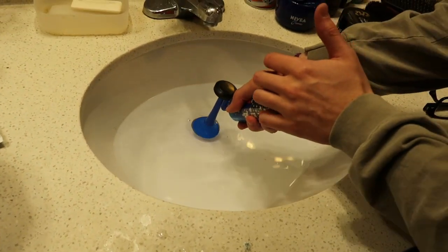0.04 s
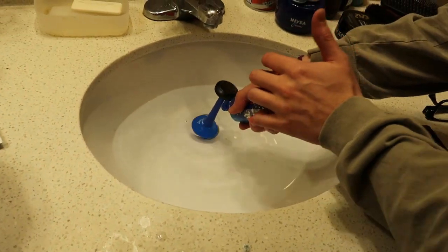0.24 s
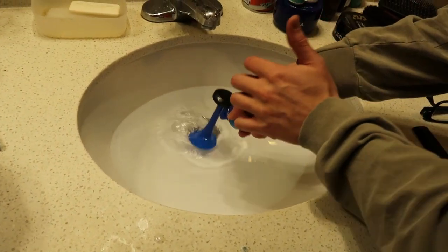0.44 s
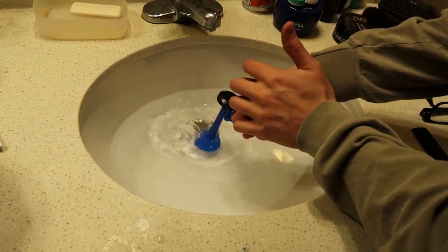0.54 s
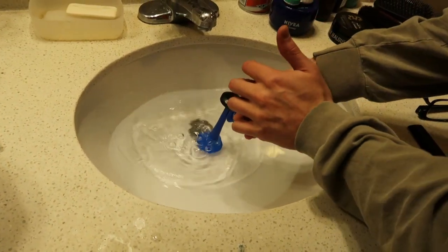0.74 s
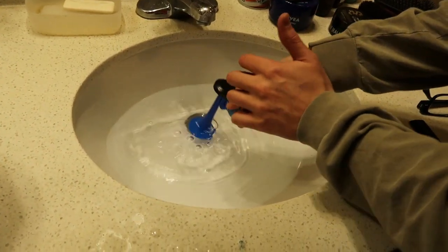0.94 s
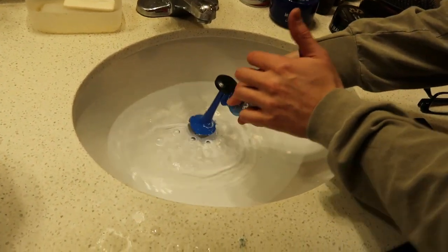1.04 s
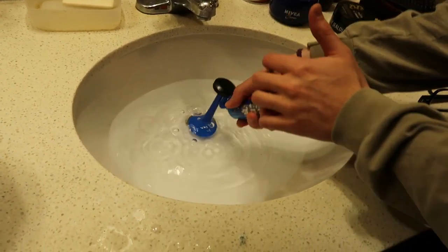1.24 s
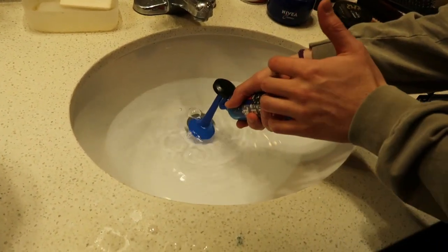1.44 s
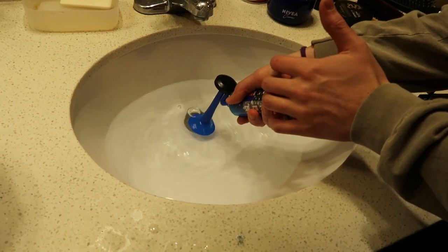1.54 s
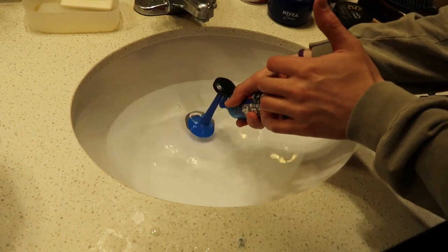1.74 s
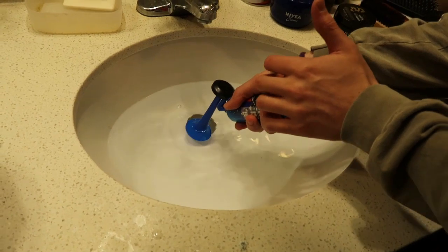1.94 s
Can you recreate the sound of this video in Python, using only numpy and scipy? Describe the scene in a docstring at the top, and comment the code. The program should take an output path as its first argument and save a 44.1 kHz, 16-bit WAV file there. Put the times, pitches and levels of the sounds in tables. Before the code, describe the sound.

A small bulb horn squeezed underwater in a sink gives quick squeaky honks, then bubbles and wheezes

```python
"""Underwater bulb horn

A small bulb horn, its bell under water in a sink, honks low, high, high, low: harmonic series of sagging pitch.
Bubbles gulp as gliding sinusoids and splashes burst as decaying noise. Air then hisses back in as band-shaped
noise with a pipe tone; plastic taps are resonant noise bursts over a thud, and drips are late bubbles.
A small tiled room adds a decaying noise tail; steady noise and two sinusoids give its rumble, hiss and hum."""
import sys
import numpy as np
from scipy import signal
from scipy.fft import rfft, irfft, next_fast_len
from scipy.io import wavfile
from scipy.ndimage import uniform_filter1d, map_coordinates

SR = 44100
rng = np.random.default_rng(int(sys.argv[2]) if len(sys.argv) > 2 else 0)


def amplitude_ratio(level_db):
    """Convert a level in decibels to the matching linear amplitude (field) ratio."""
    exponent = np.asarray(level_db, float) / 20
    return 10 ** exponent


def generate_wav(sig):
    """Save sig (samples, or channels by samples) to the path in sys.argv[1] as 16-bit PCM at SR."""
    pcm = np.round(np.clip(np.atleast_2d(sig).T, -1, 1) * 32767).astype(np.int16)
    wavfile.write(sys.argv[1], SR, pcm)


N = 88200
T = np.arange(N) / SR


def unit(x):
    """Normalization: scale to rms 1."""
    return x / np.sqrt(np.mean(x ** 2) + 1e-20)


def along(points, hz):
    """Interpolation of (f/Hz, value) points on a logarithmic frequency axis."""
    f, v = np.transpose(points)
    return np.interp(np.log(hz + 1), np.log(f + 1), v)


def wobble(rate):
    """Random modulation: a smooth curve through rate random knots a second."""
    return map_coordinates(rng.standard_normal(1500), [np.minimum(T * rate, 1498)])


def filtered(x, response):
    """Linear filtering: multiply the spectrum of x by a response of frequency."""
    m = next_fast_len(x.shape[-1] + 8192)
    spectrum = rfft(x, m) * response(np.fft.rfftfreq(m, 1 / SR))
    return irfft(spectrum, m)[..., :x.shape[-1]]


def rush(spectrum, alike):
    """Partial coherence: stereo noise of rms 1, its left-right likeness set by the mid/side balance."""
    def balance(hz):
        angle = np.arccos(np.clip(along(alike, hz), -1, 1)) / 2
        return amplitude_ratio(along(spectrum, hz)) * [np.cos(angle), np.sin(angle)]

    mid, side = filtered(rng.standard_normal((2, N)), balance)
    return unit(np.array([mid + side, mid - side]))


def add(out, s, sound):
    """Superposition: mix a sound in at time s."""
    part = out[round(s * SR):][:len(sound)]
    part += sound[:len(part)]


# spectrum of the steady noise: f/Hz, relative level/dB
NOISE_SPECTRUM = [(12, -42.5), (20, -10.5), (122, -9), (1070, -22.5), (2610, -25.5), (4070, -29.5),
                  (12800, -41.5), (15500, -86)]
# coherence of the steady noise: f/Hz, left-right likeness
NOISE_LIKENESS = [(60, 1), (1500, 0.19), (8000, .1)]
# hum, before its waver: f/Hz, level/dB
HUM_TONES = [(55, -60), (120, -66.5)]


def background():
    """Stationary noise for the rumble and hiss, with sinusoids of wavering amplitude for the hum."""
    hum = np.zeros(N)
    for hz, db in HUM_TONES:
        hum += amplitude_ratio(db + 7.9 * wobble(21)) * np.sqrt(2) * np.sin(2 * np.pi * hz * T)
    noise_db = -56.5 + 0.4 * wobble(0.94)
    return amplitude_ratio(noise_db) * rush(NOISE_SPECTRUM, NOISE_LIKENESS) + hum


# reverberation time: f/Hz, t60/s
REVERBERATION = [(200, 0.48), (2000, 0.3), (10000, 0.29)]


def room(x):
    """Frequency-dependent reverberation: convolution with noise that dies at its own speed in each band."""
    hz, t, z = signal.stft(rng.standard_normal((2, SR // 2)), SR, nperseg=256)
    decay = amplitude_ratio(-60 * t / along(REVERBERATION, hz)[:, None])
    tail = signal.istft(z * decay, SR, nperseg=256)[1]
    # the side part grows with frequency, so the bass stays alike in both ears
    mid, side = filtered(tail, lambda f: np.array([1 + 0 * f, np.clip(f / 6000, 0, 1)]))
    tail = np.array([mid + side, mid - side])
    delayed = np.pad(x, (200, 0))[None]  # predelay in samples
    return signal.fftconvolve(delayed, tail / np.linalg.norm(tail[0]), axes=1)[:, :N]


# returning air: t/s, hiss level/dB, thin hiss level/dB, pipe tone level/dB
AIR_LEVELS = [(0.941, -72.5, -93, -92), (1.04, -51.5, -70, -66), (1.13, -55.5, -69.5, -55.5),
              (1.198, -48.5, -53.5, -45), (1.299, -58, -60, -51), (1.43, -57, -65, -55),
              (1.621, -84, -74, -71.5)]
# spectrum of the hiss: f/Hz, relative level/dB
HISS_SPECTRUM = [(550, -5.5), (1300, -13), (1600, 1.5), (2000, -1.5), (2600, 0), (3300, -11), (3800, -51.5)]
# spectrum of the thin hiss: f/Hz, relative level/dB
THIN_SPECTRUM = [(3000, -29), (4050, 2.5), (4500, -9.5), (5150, 2.5), (5800, -9.5), (15000, -21.5)]


def refill():
    """Turbulence and pipe resonance: air sucked back gives two hisses and a breathy, narrow-band tone."""
    s, *cols = np.transpose(AIR_LEVELS)
    hiss_db, thin_db, pipe_db = [np.interp(T, s, c, left=-120, right=-120) for c in cols]
    pipe_hz, pipe_width_hz = 440, 36
    pipe = unit(filtered(rng.standard_normal(N), lambda f: 1 / (1 + ((f - pipe_hz) / pipe_width_hz) ** 2)))
    alike = [(500, 0.92)]  # the same likeness at all frequencies
    flutter_db = 1.5 * wobble(40)
    hiss = amplitude_ratio(hiss_db + flutter_db) * rush(HISS_SPECTRUM, alike)
    thin_hiss = amplitude_ratio(thin_db + flutter_db) * rush(THIN_SPECTRUM, alike)
    return hiss + thin_hiss + amplitude_ratio(pipe_db) * pipe


# taps of plastic: t/s, clack level/dB, rattle length/s, main resonance f/Hz, thud level/dB
PLASTIC_TAPS = [(1.135, -33, 0.005, 1650, -30.5), (1.1415, -26, .001, 682, -22),
                (1.477, -29, 0.024, 2500, -43), (1.539, -34, 0.003, 1540, -27.5),
                (1.796, -26.5, .014, 2415, -53)]
# colour of the plastic: multiple of the main resonance, relative level/dB
PLASTIC_COLOUR = [(.12, -13), (.3, -15), (.58, -6), (.75, -17), (1, 0), (1.25, -18), (1.6, -28), (2.4, -42),
                  (6, -65)]


def taps():
    """Impact excitation: rattling noise bursts in the colour of the plastic, over a decaying low thud."""
    out, t = np.zeros(N), T[:SR // 4]
    rattle_gap_s, plastic_t60_s = .0046, 0.027
    thud_hz, thud_t60_s = 95, 0.036
    onset = 1 - np.exp(-(t / .0004) ** 2)
    for s, db, rattle_s, main_hz, thud_db in PLASTIC_TAPS:
        colour = [(m * main_hz, d) for m, d in PLASTIC_COLOUR]
        for k in range(1 + int(rattle_s / rattle_gap_s)):
            noise = rng.standard_normal(len(t))
            clack = unit(filtered(noise, lambda f: amplitude_ratio(along(colour, f)))) * onset
            add(out, s + rattle_gap_s * k, amplitude_ratio(db - 0.5 * k - 60 * t / plastic_t60_s) * clack)
        add(out, s, amplitude_ratio(thud_db - 60 * t / thud_t60_s) * np.sin(2 * np.pi * thud_hz * t))
    return out


# bubbles: t/s, start f/Hz, end f/Hz, glide time/s, level before the envelope/dB
GLIDING_BUBBLES = [(0.208, 326, 337, 0.0081, -35), (0.339, 203, 255, 0.029, -26),
                   (.38, 431.5, 1058, 0.065, -35), (.488, 334.5, 360.5, 0.04, -27),
                   (0.486, 444.4, 618, 0.0088, -21.5), (.515, 603, 1032, 0.077, -50),
                   (.56, 200, 246, 0.012, -40), (.67, 546, 1044, 0.051, -42),
                   (0.821, 205, 269, 0.047, -47.5), (.84, 573, 1103, .035, -42),
                   (1.544, 414, 441, .03, -44.5), (1.535, 353, 342, 0.016, -29),
                   (1.677, 1500, 1637, 0.017, -41), (1.685, 1784, 2450, 0.018, -54),
                   (1.872, 99.5, 125, 0.078, -43), (1.889, 219, 286, 0.013, -35)]


def bubbles():
    """Bubble resonance: each bubble is a roughened sinusoid, most gliding upward as they surface."""
    out, t = np.zeros(N), T[:SR // 4]
    for s, start_hz, end_hz, glide_s, db in GLIDING_BUBBLES:
        u = t / glide_s
        hz = start_hz * (end_hz / start_hz) ** np.minimum(u, 1)
        rough_db = 5 * wobble(110)[:len(t)]
        envelope = amplitude_ratio(db - 8.6 * u ** 2 + rough_db) * (1 - np.exp(-u / 0.069))
        add(out, s, envelope * np.sin(2 * np.pi * np.cumsum(hz) / SR))
    return out


# splashes and brief hits as noise bursts: t/s, level before the envelope/dB, t60/s, treble tilt/(dB per octave)
NOISE_BURSTS = [(0.213, -24.5, 0.054, -3.5), (.328, -35.5, 0.056, 5.5), (0.488, -0.5, 0.016, -4.5),
                (0.53, -33, .3, -5), (.815, -33, 0.11, -10), (1.407, -28.5, 0.032, -3),
                (1.891, -48.5, 0.43, -9)]


def splashes():
    """Broadband transients: tilted noise with a soft onset and exponential decay."""
    out, t = np.zeros(N), T[:SR // 4]
    for s, db, t60, tilt_db in NOISE_BURSTS:
        noise = rng.standard_normal(len(t))
        # the tilt flattens out below about 1 kHz
        noise = unit(filtered(noise, lambda f: amplitude_ratio(tilt_db * np.log2(f / 1000 + 0.85)) * (f > 150)))
        add(out, s, amplitude_ratio(db - 60 * t / t60) * (1 - np.exp(-t / 0.0097)) * noise)
    return out


# spectrum of the rasping air: f/Hz, relative level/dB
RASP_SPECTRUM = [(150, -26.5), (400, -2.5), (1200, 0), (2500, -6), (5000, -6), (13000, -9), (16000, -28.5)]


def honk(rows, levels, tones_db, jitter):
    """Harmonic series of a reed: the fundamental, wavering overtones and rasping air."""
    s, *cols = np.transpose(rows)
    hz, bright_db, pan_db = [np.interp(T, s, c) for c in cols]
    db = np.interp(T, *np.transpose(levels))
    gate = np.clip(np.minimum(T - levels[0][0], s[-1] - T) / 0.0007, 0, 1)
    # the faster the pitch falls, the rougher the reed
    fall_rate = -np.gradient(np.log(hz)) * SR
    roughness = np.clip((fall_rate - 2) * .009, 0, .12)
    unsteady = 1 + jitter * wobble(90) - roughness * np.abs(wobble(400))
    phase = 2 * np.pi * np.cumsum(hz * unsteady) / SR

    upper = np.zeros((2, N))
    for k, tone_db in enumerate(tones_db):
        lean_db = 2.0 * wobble(45)  # left-right level wander
        skew = 0.3 * (k + 1) * wobble(23)  # left-right phase scatter in rad
        grain = 1 + 120 * jitter * wobble(600)  # fast flutter
        swell_db = 3 * wobble(40)  # each overtone swells on its own
        level = amplitude_ratio(tone_db + swell_db + [lean_db, -lean_db])
        start = rng.uniform(0, 2 * np.pi)
        upper += grain * level * np.sin((k + 2) * phase + start + [skew, -skew])
    # brightness raises the rasp half as many dB as the overtones
    rasp_db = -40 - bright_db / 2 + 8.3 * wobble(45)
    upper += amplitude_ratio(rasp_db) * rush(RASP_SPECTRUM, [(500, 0.26), (9000, 0.083)])

    effort = np.sqrt(np.abs(uniform_filter1d(amplitude_ratio(db) ** 2, size=900)))  # smoothed level
    fundamental = amplitude_ratio(db + [pan_db / 2, -pan_db / 2]) * np.sin(phase)
    return gate * np.sqrt(2) * (fundamental + effort * amplitude_ratio(bright_db) * upper)


# low honks, one list each: t/s, f/Hz, overtone gain/dB, left minus right level/dB
LOW_PITCHES = [
    [(.2, 1322, -20, 6), (.22, 1320, -7, -10.5), (.27, 1282, 8, -5.5), (.316, 1224, 2.5, 4),
     (.33, 1189, 8.5, -5), (.35, 1016, 7.5, 4)],
    [(.66, 1336, -7.5, -10), (.72, 1329, 1, 9), (.815, 1290, 0.5, 8), (.835, 1272, -27.5, -1),
     (.9, 1256, -28, 4)],
]
# high honks, one list each: t/s, f/Hz, overtone gain/dB
HIGH_PITCHES = [
    [(.342, 3069, 9), (.375, 2983, 11), (.39, 2939, -6.5), (.43, 2827, 12), (.44, 2857, -8),
     (.462, 2781, -4), (.467, 2414, -24.5), (.49, 1997, -25)],
    [(.482, 3078, 11), (.51, 3012, -5), (.628, 2875, 4), (.636, 2565, -26), (.662, 1630, -32)],
]
# fundamental of each low honk: t/s, level/dB
LOW_FUNDAMENTALS = [
    [(.19, -46.5), (.204, -27), (.216, -10.5), (.266, -22.5), (.284, -18.5), (.312, -16), (.328, -11.5),
     (.342, -21), (.35, -29.5)],
    [(.66, -53), (.698, -28.5), (.724, -37.5), (.74, -23), (.75, -38), (.79, -29), (.81, -40.5),
     (.828, -31.5), (.862, -53), (.885, -42), (.9, -82)],
]
# fundamental of each high honk: t/s, level/dB
HIGH_FUNDAMENTALS = [
    [(.342, -33.5), (.355, -18.5), (.369, -12.5), (.378, -21.5), (.388, -10), (.408, -12.5), (.42, -22),
     (.428, -14), (.438, -13), (.445, -25), (.454, -8.5), (.463, -15), (.468, -22), (.49, -32)],
    [(.482, -35), (.492, -10.5), (.512, -12.5), (.518, -23.5), (.523, -10.5), (.53, -36.5), (.556, -32),
     (.573, -18.5), (.59, -30.5), (.618, -29.5), (.628, -24.5), (.64, -28), (.662, -41.5)],
]
# harmonics 2, 3, .. before the overtone gain, re fundamental: level/dB
FIRST_LOW_HARMONICS = [-14.5, -18.5, -19.5, -26, -23.5, -34.5, -24, -28.5, -34, -39, -55]
# the same for the weaker last honk: level/dB
LAST_LOW_HARMONICS = [-12.5, -26, -27, -32, -28, -33, -22, -22, -34, -38]
# the same for the high honks: level/dB
HIGH_HARMONICS = [-20, -30, -22, -31.5]


def honks():
    """Two registers of one reed: a low honk, two high ones and a weaker low one."""
    out = np.zeros((2, N))
    low_harmonics = [FIRST_LOW_HARMONICS, LAST_LOW_HARMONICS]
    for rows, levels, tones_db in zip(LOW_PITCHES, LOW_FUNDAMENTALS, low_harmonics):
        out += honk(rows, levels, tones_db, jitter=.0008)
    for rows, levels in zip(HIGH_PITCHES, HIGH_FUNDAMENTALS):
        panned = [(*row, 2) for row in rows]  # left minus right in dB
        out += honk(panned, levels, HIGH_HARMONICS, jitter=.003)
    return out


# upper register at the low starts: peak t/s, width/s, f/Hz, list of partials 1-4 level/dB
UPPER_REGISTER = [(.224, 0.012, 2939, [-33.5, -43, -54, -42]),
                  (0.687, 0.029, 2995, [-49, -52.5, -60, -58.5])]
# each upper partial plus -1, 0, 1, .. 5 times the low pitch: relative level/dB
COMBINATION_TONES = [-6.5, 2, 0.5, -4, -23.5, -6.5, -20.5]


def overblowing():
    """Combination tones: upper partials shifted by multiples of the low pitch, in brief Gaussian swells."""
    out, low_hz = np.zeros(N), 1322
    for s, width, hz, partials_db in UPPER_REGISTER:
        swell = np.exp(-((T - s) / width) ** 2)
        for m, partial_db in enumerate(partials_db):
            for k, relative_db in enumerate(COMBINATION_TONES):
                tone_hz = (m + 1) * hz + (k - 1) * low_hz
                level = amplitude_ratio(partial_db + relative_db + 3.9 * wobble(60))
                out += swell * level * np.sin(2 * np.pi * tone_hz * T + rng.uniform(0, 2 * np.pi))
    return out


def scene():
    """Superposition of direct sound, reverberation, returning air and background."""
    near = honks() + overblowing() + bubbles() + splashes() + taps()
    return near + amplitude_ratio(-5.5) * room(near.mean(0)) + refill() + background()


def top_cut(x):
    """Nothing passes above the cut-off."""
    return signal.sosfilt(signal.butter(12, 15800, fs=SR, output="sos"), x)


def record(dry):
    """Final stage of the signal chain: takes the finished mix and returns the output signal."""
    return top_cut(dry)


dry = scene()
out = record(dry)
generate_wav(out)
```